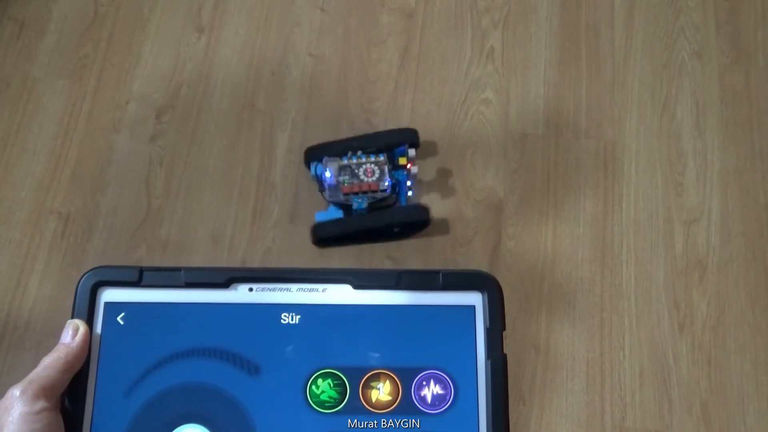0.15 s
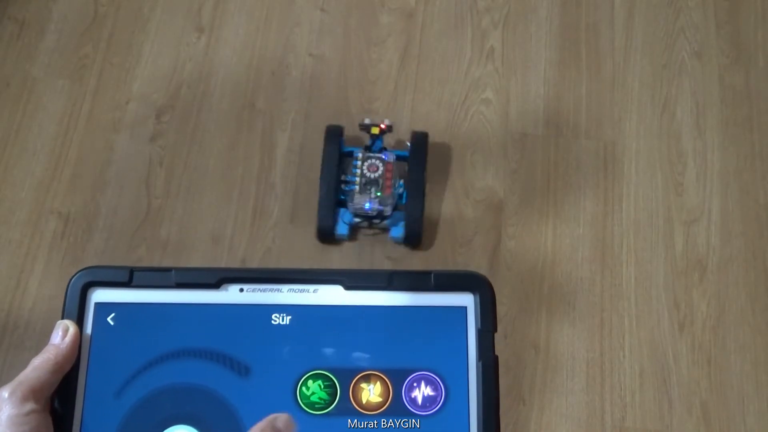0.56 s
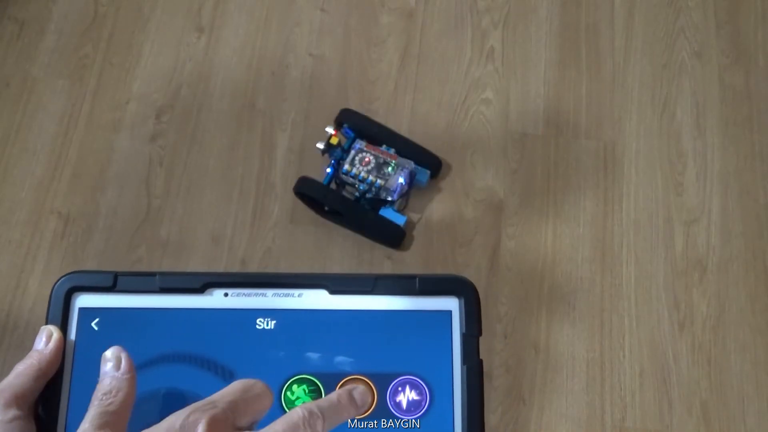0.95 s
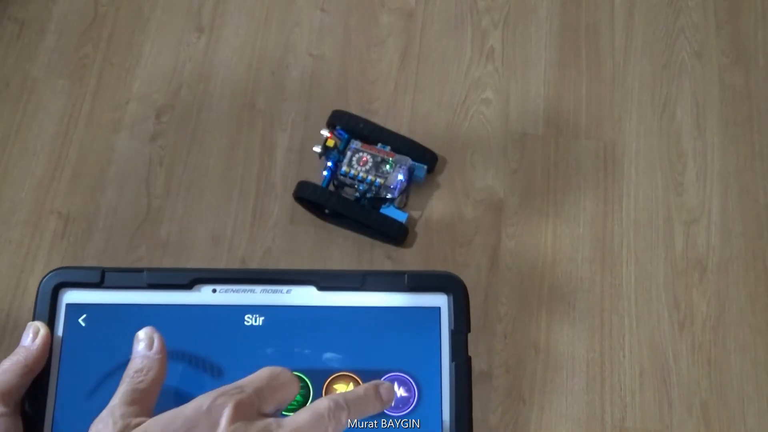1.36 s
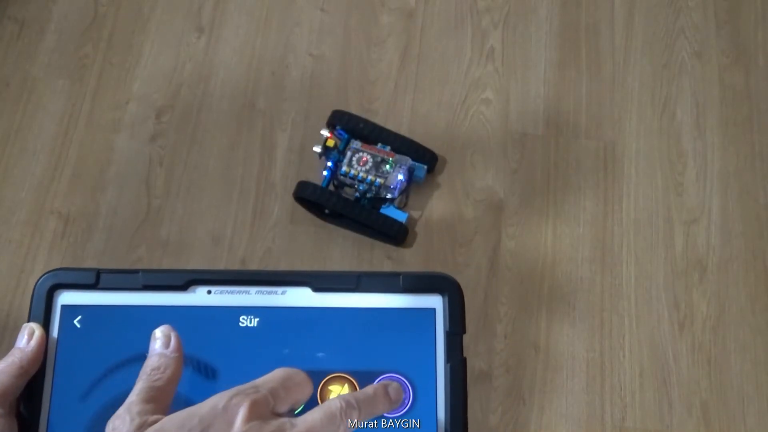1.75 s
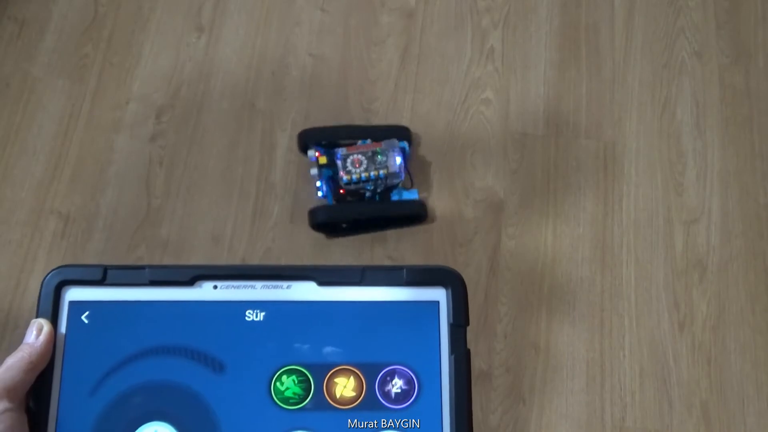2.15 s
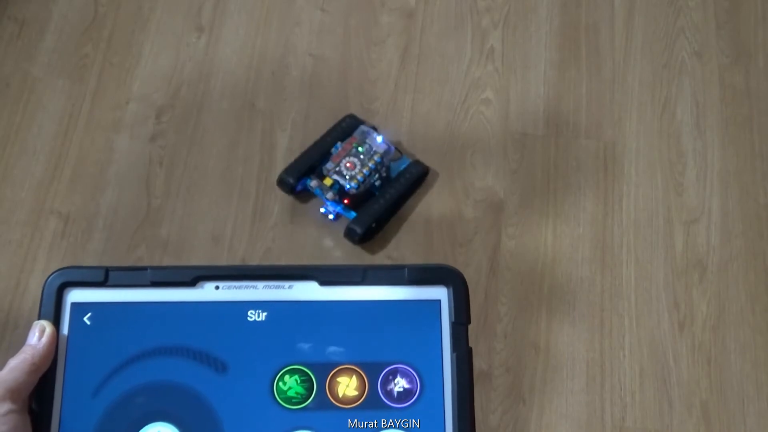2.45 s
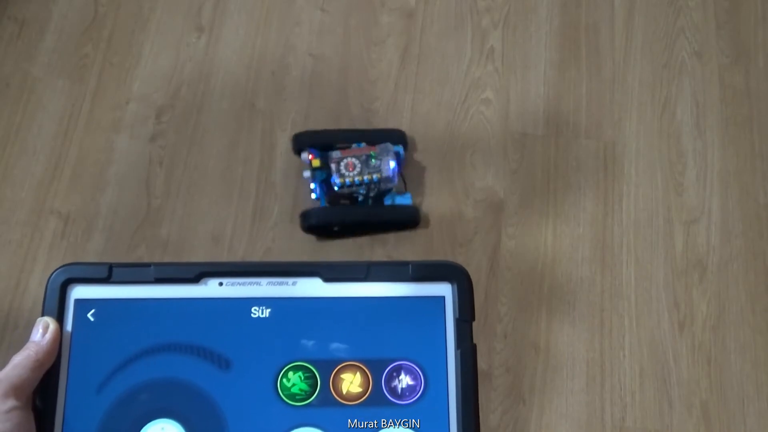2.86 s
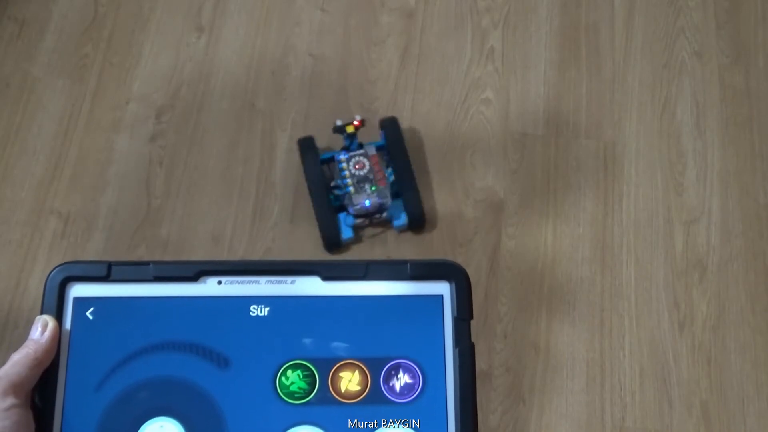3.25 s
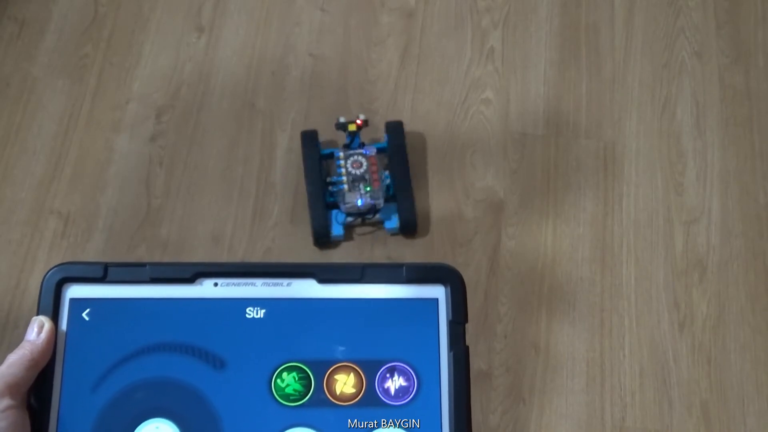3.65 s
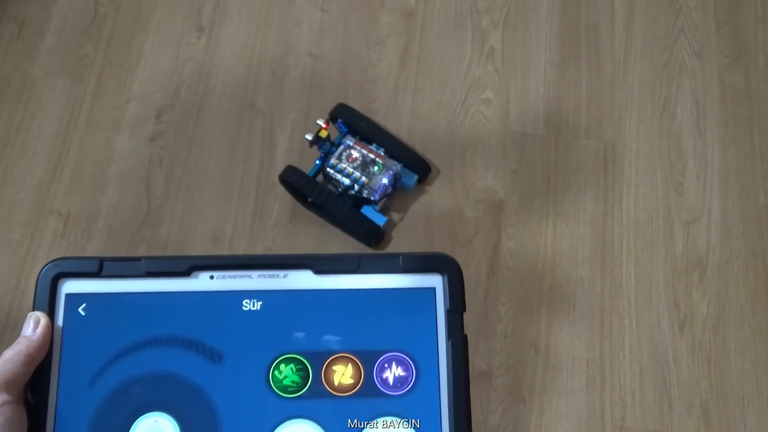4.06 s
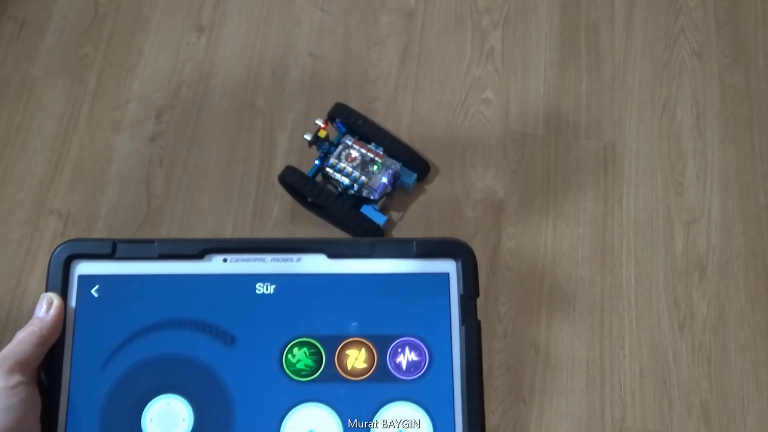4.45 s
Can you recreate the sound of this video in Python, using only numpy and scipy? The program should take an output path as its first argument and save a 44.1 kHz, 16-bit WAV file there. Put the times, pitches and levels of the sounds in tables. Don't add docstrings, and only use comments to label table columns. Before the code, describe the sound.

Close stereo pickup indoors: a harsh, wavering duet of tiny gear motors is already running, with an early double knock and rattling tracks. It slides down to silence with faint hum and ticking, then restarts in a short burst, a longer one ending in loud cracks, and a last brief spurt before quiet.

```python
import sys
import numpy as np
from scipy import signal
from scipy.fft import rfft, irfft
from scipy.io import wavfile
from scipy.ndimage import uniform_filter1d

SR = 44100
rng = np.random.default_rng(int(sys.argv[2]) if len(sys.argv) > 2 else 0)


def master(y):
    cut = np.clip(np.atleast_2d(y).T, -1, 1)
    pcm = np.round(cut * 32767)
    wavfile.write(sys.argv[1], SR, pcm.astype(np.int16))


def magnitude_from_level(level_db):
    exponent = np.asarray(level_db, float) / 20
    return 10 ** exponent


N = 202551


def rms_one(x):
    return x / np.sqrt(np.mean(x ** 2) + 1e-20)


def at_hz(points, hz):
    points = np.array(points)
    return np.interp(np.log(hz), np.log(points[:, 0]), points[:, 1])


def in_time(tables, fade_s):
    t = np.arange(N) / SR
    start_s, *columns = np.transpose(np.vstack(tables))
    gate = 0
    for rows in tables:
        first, last = rows[0][0], rows[-1][0]
        gate = gate + np.interp(t, [first - fade_s, first, last, last + fade_s], [0, 1, 1, 0])
    return np.minimum(gate, 1), [np.interp(t, start_s, column) for column in columns]


def swell(rows):
    t = np.arange(N) / SR
    return sum(db * np.exp(-((t - s) / width) ** 2) for s, width, db in rows)


def held(start_s, length_s, attack_s, release_db_per_s):
    t = np.arange(N) / SR - start_s
    return np.clip(t / attack_s, 0, 1) * magnitude_from_level(-release_db_per_s * np.maximum(t - length_s, 0))


def drift(rate_hz):
    r = np.exp(-16 * np.pi * rate_hz / SR)
    slow = signal.lfilter([1], [1, -2 * r, r * r], rng.standard_normal(N // 8 + 4002))
    slow = slow[4000:]
    return np.interp(np.arange(N) / 8, np.arange(len(slow)), rms_one(slow))


def resonate(x, hz, width_hz):
    r = np.exp(-np.pi * width_hz / SR)
    top = np.array([1, 0, -1]) * (1 - r * r) / 2
    return signal.lfilter(top, [1, -2 * r * np.cos(2 * np.pi * hz / SR), r * r], x)


# pitch_hz, likeness [0-1]
LIKENESS = [(60, .996), (150, 0.99), (380, .97), (950, 0.85), (2400, 0.62), (5600, 0.71), (9000, 0.96),
            (11500, 1), (13500, 0.95)]


def coloured(spectrum, grit_db):
    hz = np.maximum(np.fft.rfftfreq(N, 1 / SR), 1)
    mid, side = rfft(rng.standard_normal((2, N)) * magnitude_from_level(grit_db * drift(72)))
    alike = np.clip(at_hz(LIKENESS, hz), 0, 1)
    pair = np.sqrt(1 + alike) * mid + np.sqrt(1 - alike) * side * [[1], [-1]]
    return rms_one(irfft(pair * magnitude_from_level(at_hz(spectrum, hz)), N))


# start_s, load_db (as gear rattle), commutator_hz
DRIVE = [(0, -27.5, 252), (.3, -30, 247), (.76, -26.5, 330.5), (1.0, -34.5, 178), (1.12, -48, 68),
         (1.2, -59, 7), (1.92, -56, -5), (2.06, -37.5, 156.5), (2.3, -33.5, 290), (2.4, -27.5, 201),
         (2.52, -50.5, 32), (2.67, -39.5, 127.5), (2.85, -32, 260), (3.38, -27.5, 281), (3.53, -48.5, 89),
         (3.67, -34.5, 203), (3.92, -31, 239), (4.22, -60.5, 5)]
FULL_LOAD_DB = -30


def drive():
    load_db, commutator_hz = in_time([DRIVE], fade_s=.04)[1]
    return load_db - FULL_LOAD_DB, commutator_hz


# start_s, tooth_hz, pressure_db (of the mesh)
LEFT = [
    [(0, 1302, -2.5), (.17, 1399, 2), (.22, 1169, -0.5), (.32, 1191, -6.5), (.36, 1280, 3.5),
     (.43, 1290, -2.5), (.52, 1331, -1), (.62, 1345, -4.5), (.68, 1386, -1)],
    [(.71, 1533, -1.5), (.74, 1608, 2), (.84, 1166, 6), (.95, 837, -10)],
    [(2.02, 608.5, -8), (2.1, 846, -8), (2.19, 1013, -5), (2.24, 1160, 0), (2.29, 1197, 0.5),
     (2.32, 1225, 0.5), (2.37, 1347, 0.5), (2.41, 1122, -13.5), (2.46, 686, 1)],
    [(2.66, 792.6, -17), (2.89, 1178, -3), (3.0, 1301, -3.5), (3.07, 1303, -0.5), (3.13, 1374, -8),
     (3.18, 1261, 4.5), (3.245, 1159, -3), (3.35, 1149, -4.5), (3.4, 1017, -3)],
    [(3.6, 676, -7), (3.67, 913, -2), (3.73, 1128, -7), (3.76, 1131, 1), (3.8, 1081, 2.5),
     (3.85, 1028, -11), (3.89, 1042, 2.5), (3.93, 952, 6.5), (4.02, 689, 3)],
]
RIGHT = [
    [(0, 906, -4), (.14, 831, 0), (.3, 1003, 1), (.36, 1040, -0.5), (.4, 1148, -2.5), (.5, 1144, 0),
     (.57, 1101, -2), (.63, 1150, -2)],
    [(.68, 1260, 2), (.78, 1318, -4), (.82, 839.3, 5), (1.05, 445, 3)],
    [(2.0, 563, -7), (2.07, 674.4, -1.5), (2.12, 660.3, -1), (2.19, 830, 2), (2.26, 980, 4),
     (2.31, 1099, 0.5), (2.36, 1178, -0.5), (2.4, 1114, 6), (2.46, 656, 6)],
    [(2.6, 517, 0.5), (2.82, 979.6, 0), (2.94, 1117, 1), (3.03, 1151, 1), (3.11, 1304, 4.5),
     (3.155, 1500, 1.5), (3.255, 1550, 1.5), (3.31, 1340, -1.5), (3.45, 837, 6)],
    [(3.58, 448, 3.5), (3.7, 655, -4.5), (3.75, 780, -3), (3.78, 929, -2.5), (3.83, 1034, -2),
     (3.87, 1085, 5), (3.9, 944, -1), (3.95, 690, 11), (4.05, 441.3, 2.5)],
]
LEFT_PARTIALS_DB = [-10.5, -8, -5.5, -13.5, -9]
RIGHT_PARTIALS_DB = [-11, -8.5, -9, -11.5, -13]
# pitch_hz, level_db
LEFT_RADIATION = [(600, -11), (1200, -13.5), (1290, -9), (1450, -14), (2600, -2.5), (3500, 0.5), (4600, 1),
                  (6500, 0.5)]
RIGHT_RADIATION = [(700, -7.5), (1070, -5.5), (1150, 3), (1290, 4.5), (1420, -2.5), (1900, -5), (3400, 0.5),
                   (6500, 1)]
# centre_s, half_width_s, lift_db
LEFT_BOOMS = [
    (0.0, 0.029, 9.5),
    (.68, .03, -4),
    (2.36, 0.034, 2),
    (3.0, 0.039, 10.5),
    (3.19, 0.13, 21),
    (3.89, 0.027, 3),
]
RIGHT_BOOMS = [
    (.17, 0.022, 13.3),
    (.5, 0.045, 3.7),
    (.72, 0.11, 6.6),
    (3.1, .04, 4.64),
    (3.88, .03, 5.9),
]
BOOM_SHARES = [1.0, 0.27, 0.075, 0.056, 0.037]
# centre_s, half_width_s, lift_db
LEFT_SHRILLS = [(.02, 0.04, 4.5), (.3, 0.07, -2.5), (0.839, 0.038, 1.5), (2.28, 0.061, 7),
                (2.92, 0.049, -7), (3.08, .09, 5), (3.28, .06, -5), (3.76, 0.041, 1.5), (3.92, 0.031, 3.5)]
RIGHT_SHRILLS = [(0.0, .04, 10), (.1, .04, -8), (.45, 0.11, 3.5), (.63, .03, -10), (.79, 0.023, -8),
                 (2.2, 0.051, -7), (2.95, 0.051, 5), (3.11, .04, -10.5), (3.21, .06, -5), (3.76, .08, -2)]
TEETH = 14
WHINE_FOLLOWS = 0.9
COAST_DULL_DB = 0.61


def motor(tables, partials_db, radiation, booms, shrills, wobble, runout, runout_db, flicker_db, half_db):
    gate, (tooth_hz, pressure_db) = in_time(tables, fade_s=0.052)
    force_db = FULL_LOAD_DB + WHINE_FOLLOWS * drive()[0] + pressure_db
    shaft = 2 * np.pi * np.cumsum(tooth_hz) / SR / TEETH
    shake = wobble * (drift(24.82) + 0.722 * drift(130)) + runout * np.sin(shaft)
    turn = 2 * np.pi * np.cumsum(tooth_hz * (1 + shake)) / SR

    boom_db = swell(booms)
    levels = []
    for k, (db, share) in enumerate(zip(partials_db, BOOM_SHARES)):
        levels.append(force_db + db + at_hz(radiation, (k + 1) * tooth_hz) + share * boom_db)
    levels[2] = levels[2] + swell(shrills)
    second, fifth = levels[1], levels[4]
    for k in range(1, 6):
        levels.append(fifth - 0.87 * k - 1.3 * (k % 2) - 8.2 * (tooth_hz * (5 + k) / 7000) ** 2)

    slowing = np.maximum(-np.gradient(np.log(tooth_hz)) * SR, 0)
    slowing = uniform_filter1d(slowing, size=900)
    out = 0
    for k, db in enumerate(levels):
        db = db - COAST_DULL_DB * k * slowing + 1.35 * drift(5.9)
        swing_db = runout_db * np.sin(shaft + rng.uniform(0, 2 * np.pi))
        shaking_db = flicker_db * drift(35) + 2.2 * drift(230) + swing_db
        out = out + magnitude_from_level(db + 3.5 + shaking_db) * np.sin((k + 1) * turn + rng.uniform(0, 2 * np.pi))
        out = out + magnitude_from_level(second + half_db + flicker_db * drift(33)) * np.sin((k + .5) * turn)
    return gate * out * magnitude_from_level(-1.6 * slowing)


# pitch_hz, width_hz, level_db
CHASSIS = [(655.7, 3.6, 2), (858, 7, -4), (1169, 12.6, 0), (1290, 7.7, -18.5), (1366, 8.9, 1.5),
           (1600, 4.3, 8), (1710, 5.4, 7), (2020, 64, -5), (2990, 16, 4.5), (3513, 27, -0.5),
           (3786, 52, -3), (4580, 130, -11), (4990, 37, 1), (5900, 23, 2.5), (6290, 37, 1.5)]


def chassis(x, lift_db):
    return x + sum(magnitude_from_level(lift_db + db) * resonate(x, hz, width) for hz, width, db in CHASSIS)


def near_echoes(x, ring_s, echo_db):
    t = np.arange(int(.4 * SR)) / SR
    tail = rms_one(rng.standard_normal(len(t)) * magnitude_from_level(-60 * t / ring_s)) / np.sqrt(len(t))
    return x + magnitude_from_level(echo_db) * signal.fftconvolve(x, tail)[:N]


def whine():
    left = motor(LEFT, LEFT_PARTIALS_DB, LEFT_RADIATION, LEFT_BOOMS, LEFT_SHRILLS,
                 wobble=.008, runout=0.012, runout_db=-1.5, flicker_db=4.0, half_db=-20.5)
    right = motor(RIGHT, RIGHT_PARTIALS_DB, RIGHT_RADIATION, RIGHT_BOOMS, RIGHT_SHRILLS,
                  wobble=.008, runout=0.014, runout_db=1.5, flicker_db=2.5, half_db=-21.5)
    return magnitude_from_level(-6.0) * near_echoes(chassis(left + right, lift_db=-2.0), ring_s=0.25, echo_db=-0.5)


# pitch_hz, level_db (per Hz)
RATTLE = [(880, -13), (1500, -9), (1650, -7), (2390, -1.5), (3500, 4), (3830, 2), (6000, 0.5), (9000, -19),
          (11700, -62), (19800, -120)]
RUMBLE = [(24, -61), (40, -52), (130, -10), (481, -8), (654, -2), (1100, -7.5), (1290, 5.5), (1440, -14.5),
          (1900, -4.5), (2470, -62), (4180, -120)]
HISS = [(4410, -23), (7500, -1.5), (8570, 1), (11500, -18.5), (13100, -15), (15500, -18.5)]
RUMBLE_DB, RUMBLE_FOLLOWS = -37.5, 0.58
HISS_DB, HISS_FOLLOWS = -43.5, 1.05
BOOM_RUMBLE_SHARE = 0.29
SHUDDER_DB, SHUDDER_S = -21, 0.073


def running_noise():
    load_db, commutator_hz = drive()
    t = np.arange(N) / SR
    rattle = rms_one(chassis(coloured(RATTLE, grit_db=0.8), lift_db=2.5))
    rattle = magnitude_from_level(FULL_LOAD_DB + load_db - 6.0) * rattle

    shudder = sum(magnitude_from_level(db + SHUDDER_DB) * np.exp(-((t - s) / SHUDDER_S) ** 2) for s, db, *_ in JOLTS)
    boom_db = BOOM_RUMBLE_SHARE * swell(LEFT_BOOMS + RIGHT_BOOMS)
    rumble_gain = magnitude_from_level(RUMBLE_DB + RUMBLE_FOLLOWS * load_db + boom_db) + shudder
    rumble = rumble_gain * magnitude_from_level(-5.5) * rms_one(chassis(coloured(RUMBLE, grit_db=3.0), lift_db=9.5))

    hiss = magnitude_from_level(HISS_DB + HISS_FOLLOWS * load_db + 2.0) * coloured(HISS, grit_db=0.5)
    return np.clip(commutator_hz / 15, 0, 1) * (rattle + rumble + hiss)


# start_s, peak_db, pitch_hz, ring_s, thud_db
JOLTS = [
    (.162, -22.5, 750, 0.2, -40),
    (0.171, -46, 810, 0.15, -50),
    (.184, -27, 704, 0.17, -59),
    (0.659, -43, 2676, .05, -53),
    (0.699, -51, 2670, 0.055, -61),
    (0.723, -30.5, 4500, .06, -65),
    (2.372, -42, 1108, 0.074, -62),
    (3.331, -26, 666, 0.17, -43),
    (3.348, -18, 1800, 0.16, -44),
    (3.391, -21, 1880, 0.18, -40.5),
]


def jolts():
    out, t = np.zeros(N), np.arange(int(.25 * SR)) / SR
    for s, db, hz, ring_s, thud_db in JOLTS:
        strike = (rng.standard_normal(len(t)) + 15 * (t == 0)) * magnitude_from_level(-60 * t / ring_s)
        knock = resonate(strike, hz, 0.14 * hz)
        knock = resonate(knock, hz, 4.4 * hz)
        thud = resonate(rng.standard_normal(len(t)) * magnitude_from_level(-60 * t / 0.36), 118, 69)
        i = round(s * SR)
        out[i:i + len(t)] += magnitude_from_level(db) * knock / np.abs(knock).max()
        out[i:i + len(t)] += magnitude_from_level(thud_db) * thud / np.abs(thud).max()
    out[:len(t)] += magnitude_from_level(-29.5 - 60 * t / 0.22) * np.sin(2 * np.pi * 1163 * t)
    return out


# start_s, length_s, level_db (at rest), sideband_share [0-1]
CHOPPER = [
    (.9, .23, -39, .55),
    (1.202, .29, -66, 0.2),
    (1.87, .4, -43.5, .55),
    (2.426, 0.078, -48, 0.6),
    (2.52, .22, -41, .6),
    (3.37, 0.067, -35.5, .7),
    (3.5, .17, -41, .6),
    (3.89, 0.11, -39, .85),
    (4.01, .14, -40.5, 0.39),
    (4.2, 0.18, -66, .3),
]
CHOP_HZ = 7821
CHOP_ATTACK_S, CHOP_RELEASE_DB_PER_S = .017, 209
CHOP_SAG_DB_PER_HZ = .055


def chopper():
    commutator_hz = drive()[1]
    bursts = [magnitude_from_level(db) * held(s, length, CHOP_ATTACK_S, CHOP_RELEASE_DB_PER_S) for s, length, db, _ in CHOPPER]
    current = sum(bursts)
    share = sum(burst * row[3] for burst, row in zip(bursts, CHOPPER)) / (current + 1e-12)
    share = np.clip(share, 0, 1) * np.minimum(commutator_hz / 70, 1)
    turn = 2 * np.pi * np.cumsum(commutator_hz * (1 + 0.07 * drift(35.5))) / SR
    carrier = 2 * np.pi * CHOP_HZ * np.arange(N) / SR
    lower = np.sin(carrier - turn) * magnitude_from_level(3.8 * drift(55.0))
    upper = 0.81 * np.sin(carrier + turn) * magnitude_from_level(2 * drift(30))
    tone = (1 - share) * np.sin(carrier) * magnitude_from_level(1.8 * drift(15)) + share * (lower + upper)
    tone = tone + magnitude_from_level(-17) * np.sin(2 * carrier)
    return current * magnitude_from_level(2.5 - CHOP_SAG_DB_PER_HZ * commutator_hz) * tone


ROOM_T60_S = 0.27


def room(x):
    t = np.arange(int(.5 * SR)) / SR
    tail = rng.standard_normal((2, len(t))) * magnitude_from_level(-60 * t / ROOM_T60_S) * (t > .004)
    tail = signal.sosfilt(signal.butter(2, [2200, 10000], "band", fs=SR, output="sos"), tail)
    tail = tail / np.sqrt(np.sum(tail ** 2) / 2)
    return signal.fftconvolve(x[None], tail, axes=1)[:, :N]


TICK_S, TICK_FROM_S = .08005, .0857


def ticking():
    t = np.arange(N) / SR - TICK_FROM_S
    cycle = t % TICK_S
    strike = (cycle < .0002) * 2.7 + rng.standard_normal(N) * magnitude_from_level(-60 * cycle / 0.059)
    tick = resonate(strike, 2680, 180) + resonate(strike, 2970, 200) + .5 * resonate(strike, 3350, 300)
    late = np.exp(-((cycle - 0.051) / 0.0066) ** 2)
    early = np.exp(-((cycle - 0.0086) / 0.0066) ** 2)
    blips = (late + 0.39 * early) * magnitude_from_level(1.3 * drift(1.8)) * np.sin(2 * np.pi * 2060 * t)
    return magnitude_from_level(-44.5) * tick + magnitude_from_level(-57.5) * blips


# start_s, length_s, level_db
RUSTLE = (1.24, .2, -64)


def rustle():
    start_s, length_s, level_db = RUSTLE
    band = signal.butter(2, [3000, 11000], "band", fs=SR, output="sos")
    cloth = rms_one(signal.sosfilt(band, rng.standard_normal(N)))
    return held(start_s, length_s, attack_s=.06, release_db_per_s=150) * magnitude_from_level(level_db) * cloth


# start_s, length_s, level_db
SQUEAK = (1.07, .52, -73)


def squeak():
    start_s, length_s, level_db = SQUEAK
    rub = rms_one(resonate(resonate(rng.standard_normal(N), 4520, 110), 4500, 110))
    return held(start_s, length_s, attack_s=.2, release_db_per_s=220) * magnitude_from_level(level_db) * rub


# pitch_hz, level_db
HUM = [(275, -64), (366, -61.5), (458, -66.5), (549, -72.5), (764, -69.5), (872, -76)]


def hum():
    t = np.arange(N) / SR
    return sum(magnitude_from_level(db + 4.5 + 2 * drift(4.1)) * np.sin(2 * np.pi * hz * t + .5 * drift(3.9)) for hz, db in HUM)


# pitch_hz, level_db (per Hz)
ROOM_TONE = [(12, -56), (20, -24), (112, -17.5), (180, -11.5), (333, -15), (362, -10), (393, -13.5),
             (452, -15), (491, -15), (788, -17), (1230, -21.5), (2030, -28), (3170, -29), (4550, -32.5),
             (15500, -38)]
ROOM_DB = -51.5


def background():
    room_tone = magnitude_from_level(ROOM_DB - 1.0) * coloured(ROOM_TONE, grit_db=-1.0)
    return room_tone + ticking() + rustle() + squeak() + hum()


def scene():
    robot = whine() + chopper() + jolts()
    direct = robot * magnitude_from_level([[-.15], [.15]])
    return direct + magnitude_from_level(-14) * room(robot) + running_noise() + background()


def low_pass(x):
    return signal.sosfilt(signal.butter(12, 15640, fs=SR, output="sos"), x)


def record(dry):
    return low_pass(dry)


dry = scene()
out = record(dry)
master(out)
```